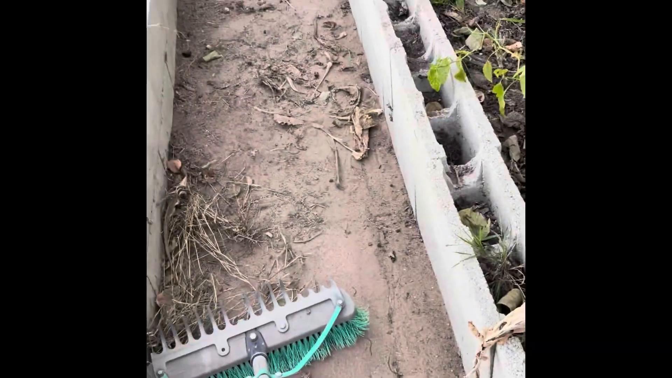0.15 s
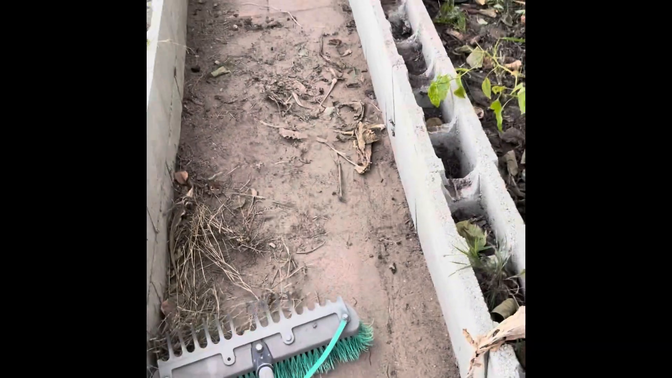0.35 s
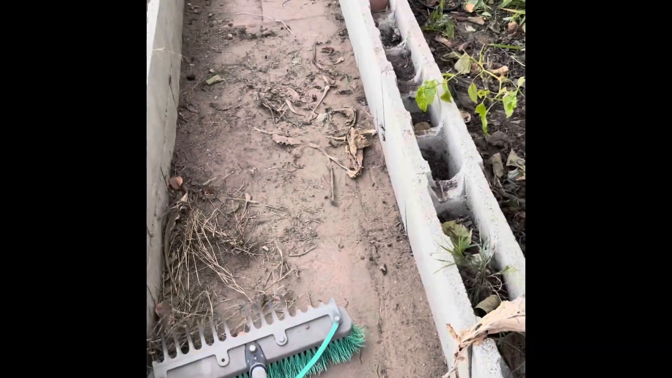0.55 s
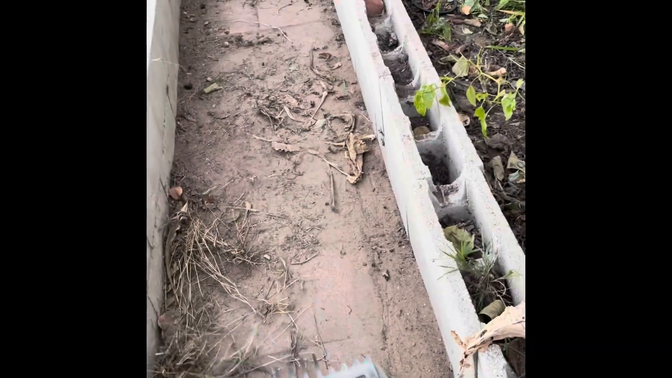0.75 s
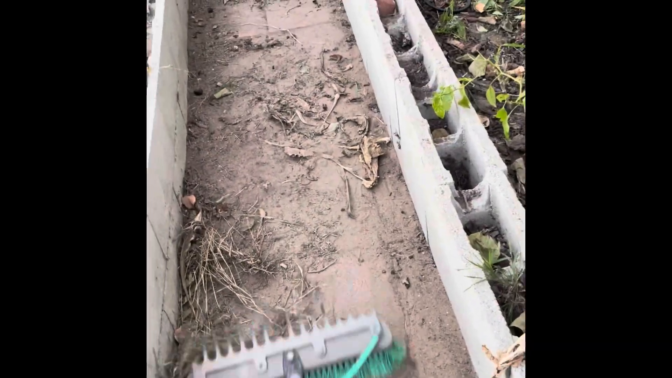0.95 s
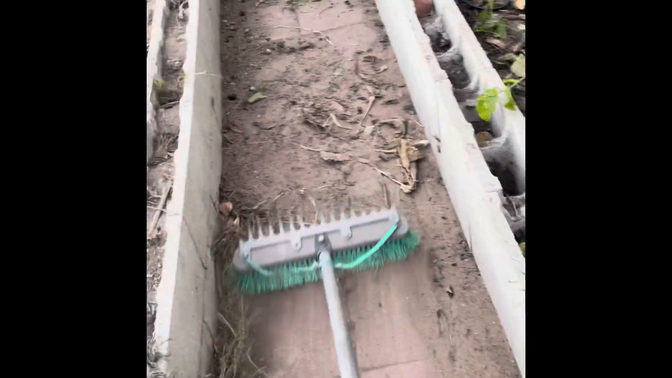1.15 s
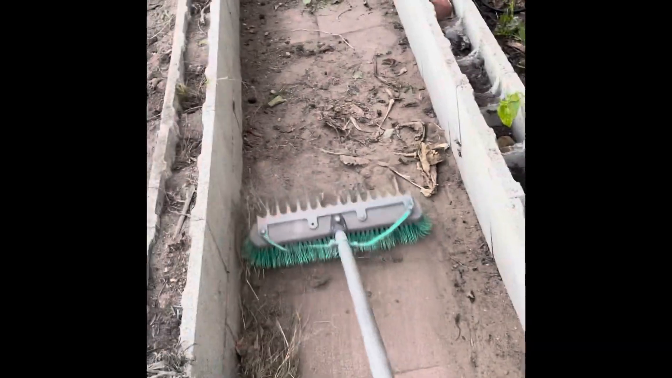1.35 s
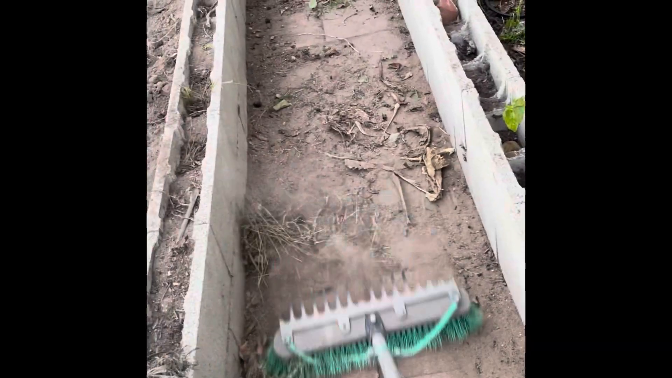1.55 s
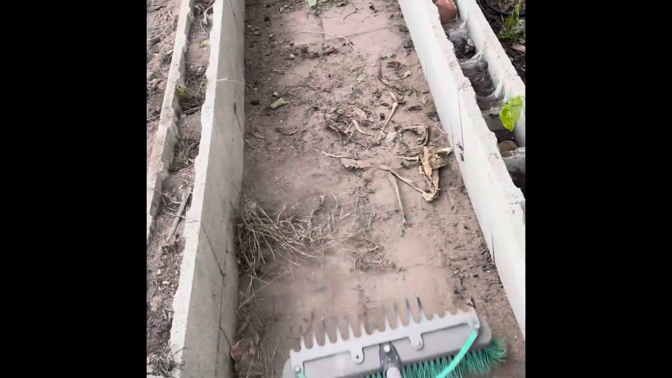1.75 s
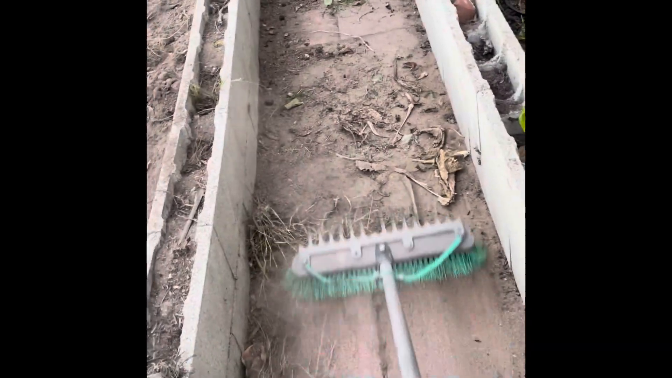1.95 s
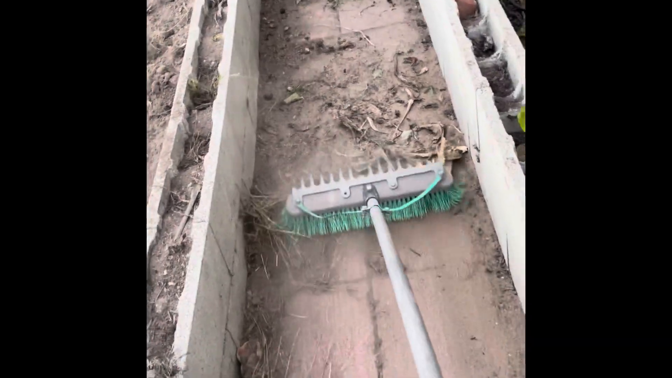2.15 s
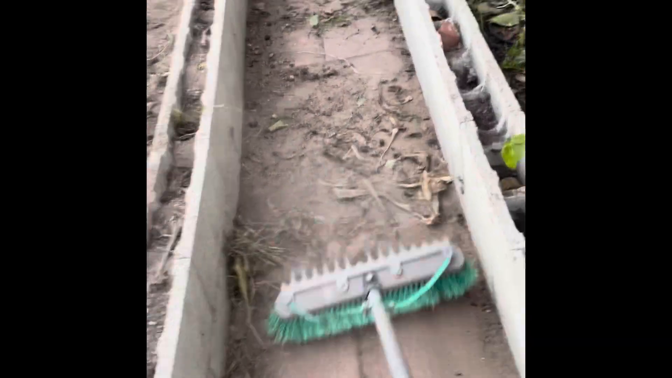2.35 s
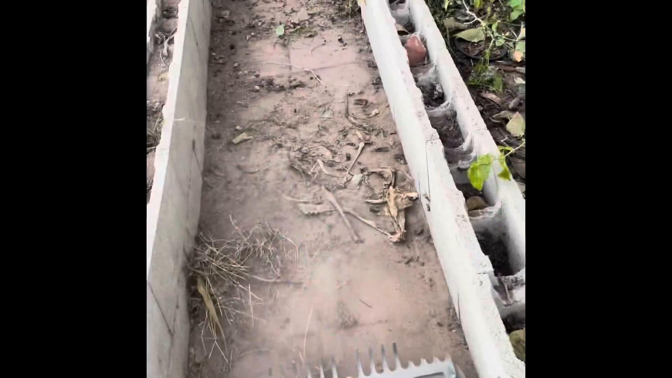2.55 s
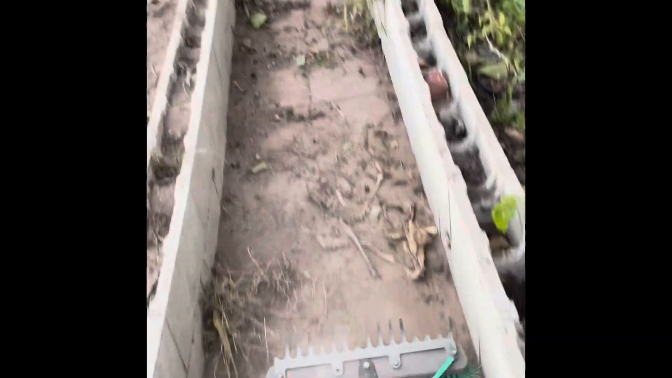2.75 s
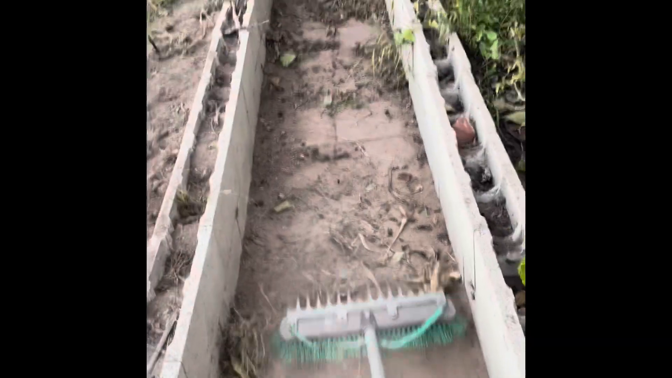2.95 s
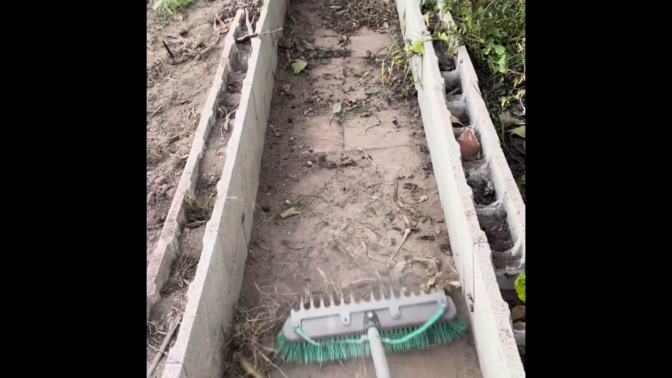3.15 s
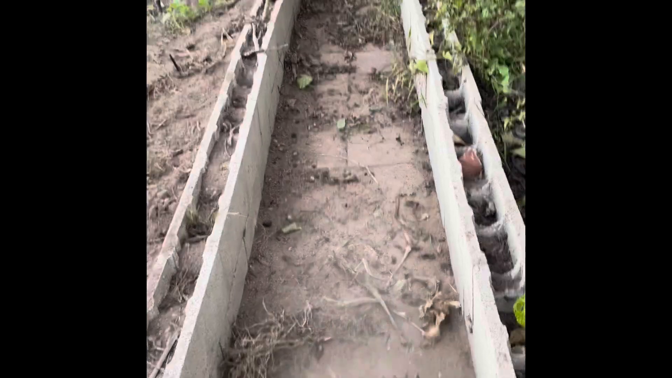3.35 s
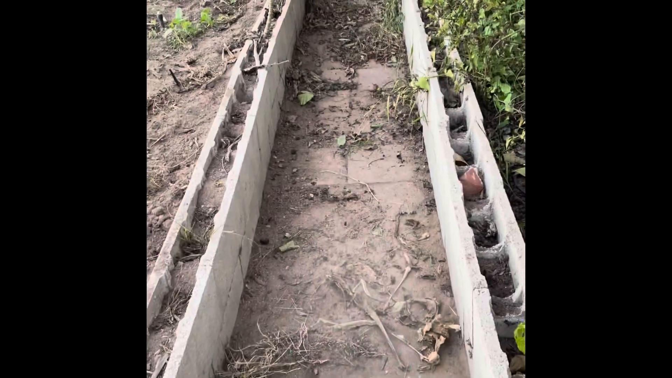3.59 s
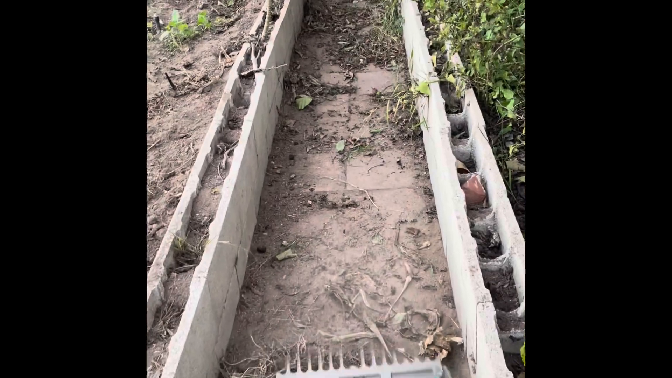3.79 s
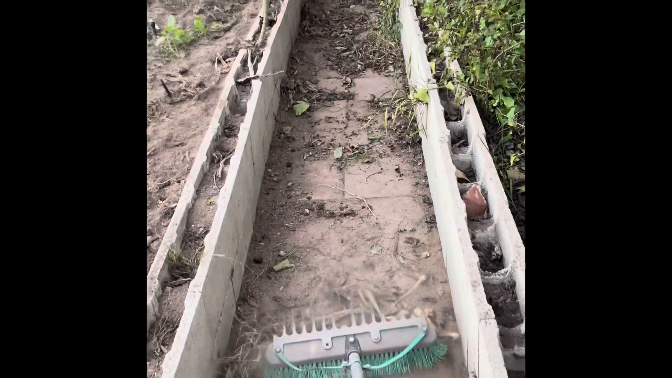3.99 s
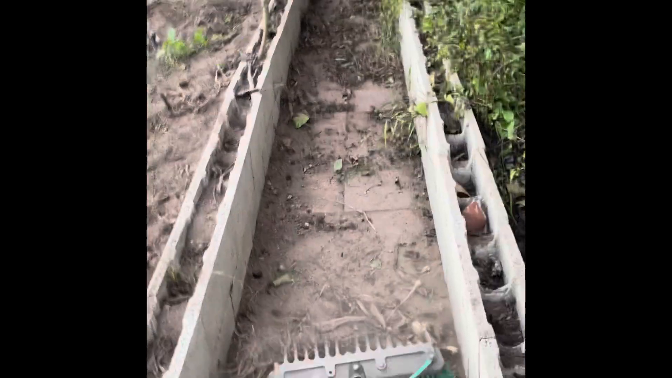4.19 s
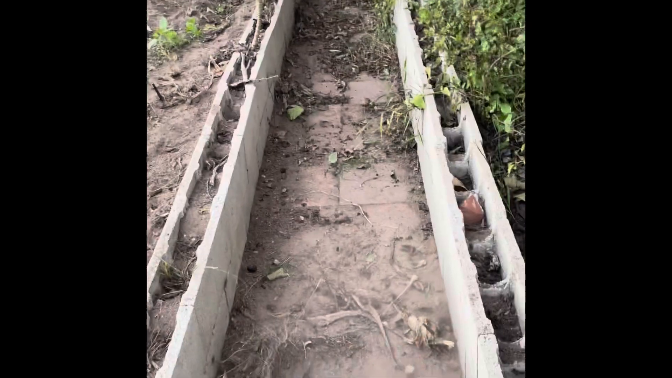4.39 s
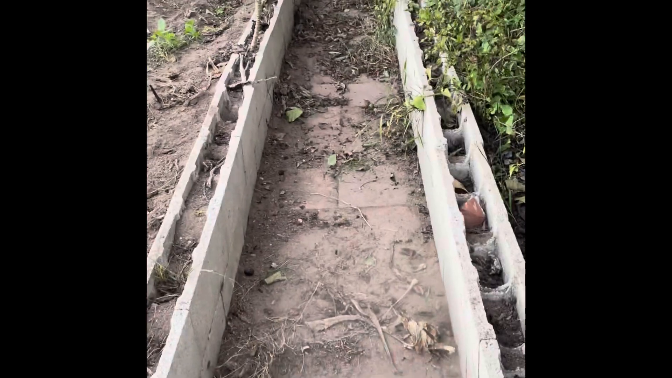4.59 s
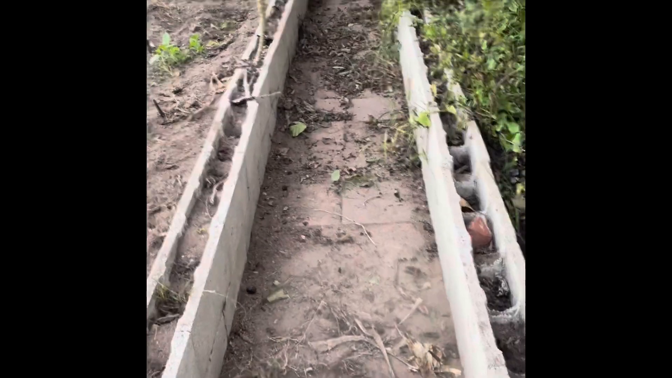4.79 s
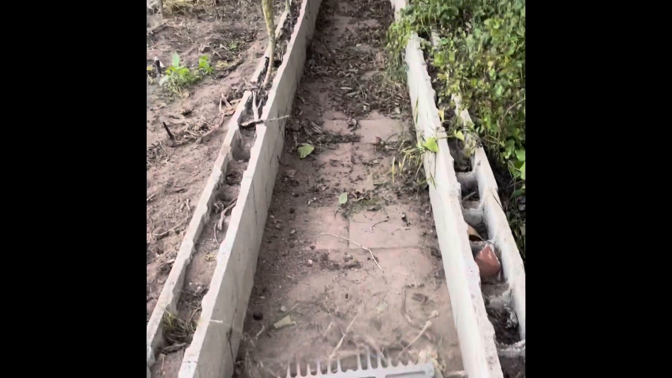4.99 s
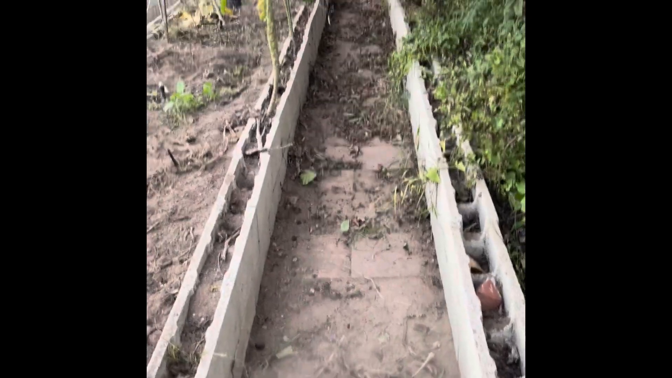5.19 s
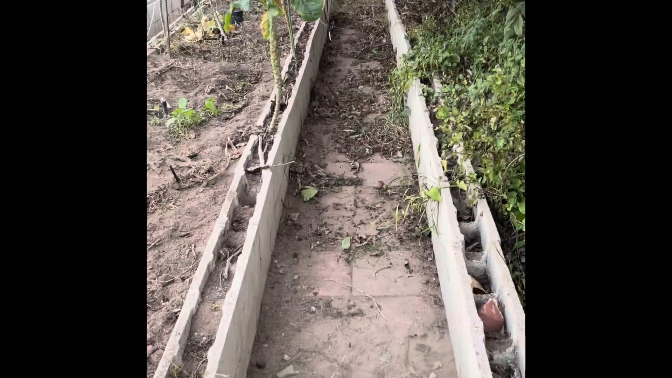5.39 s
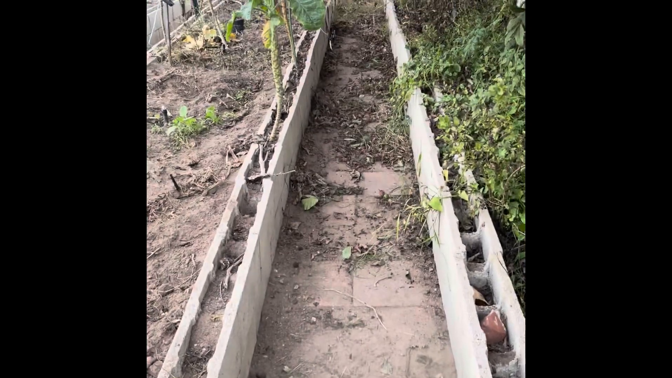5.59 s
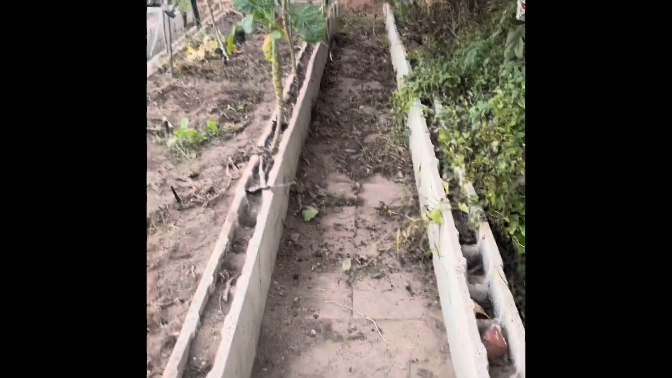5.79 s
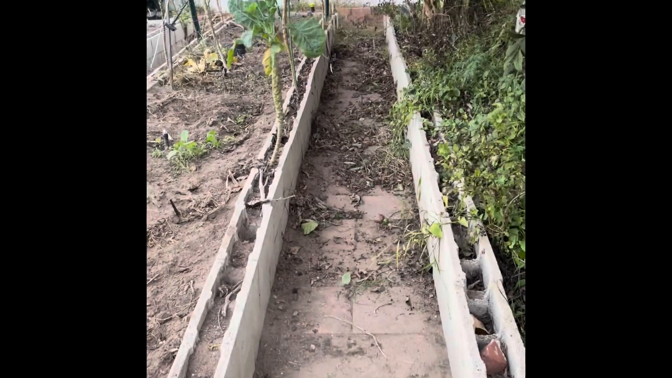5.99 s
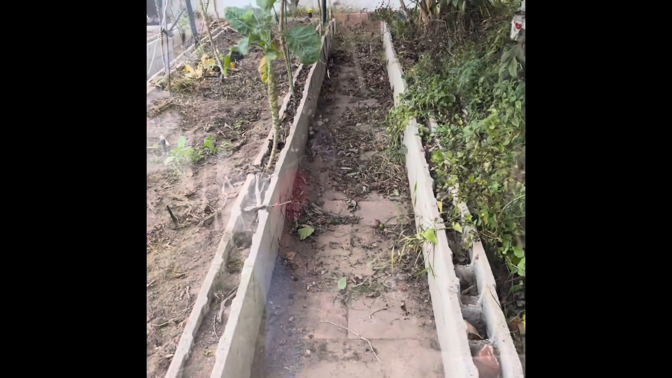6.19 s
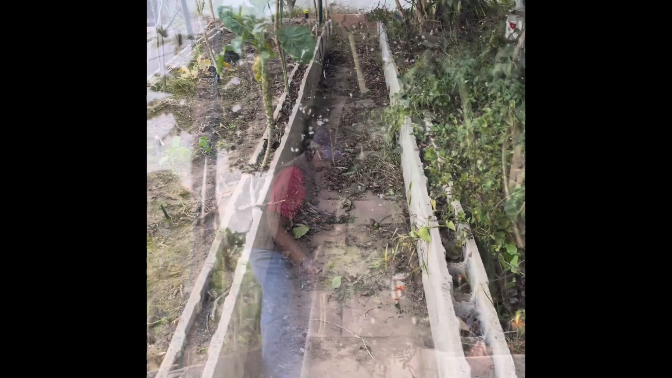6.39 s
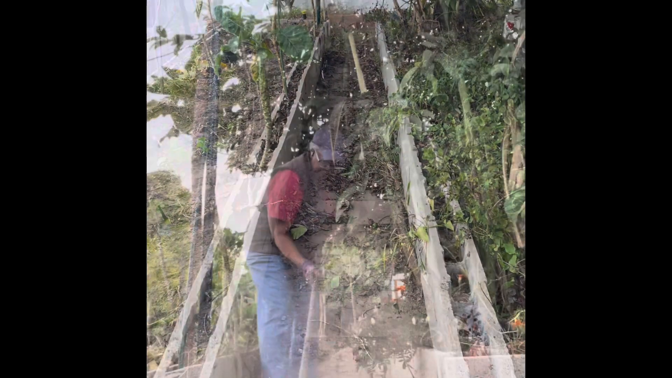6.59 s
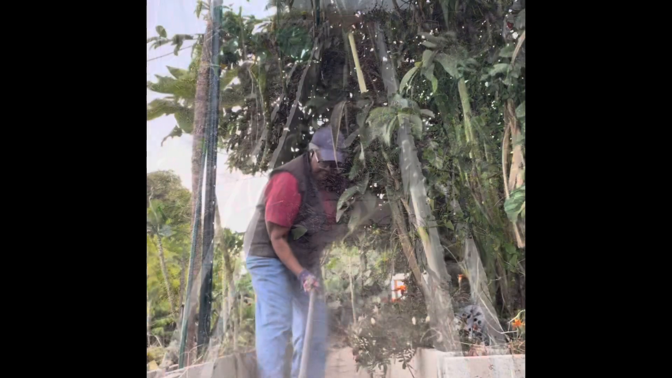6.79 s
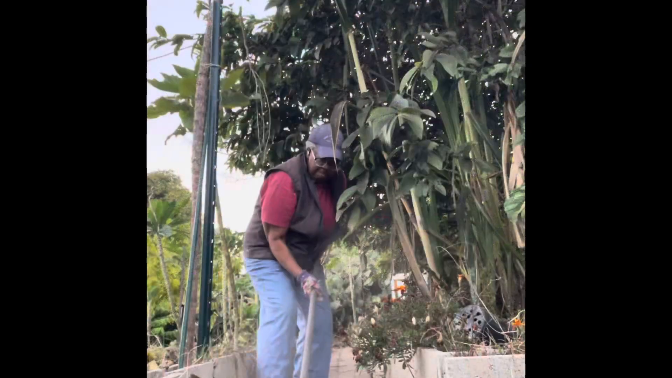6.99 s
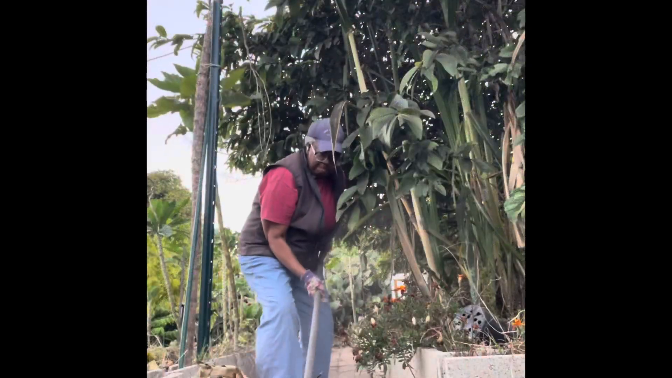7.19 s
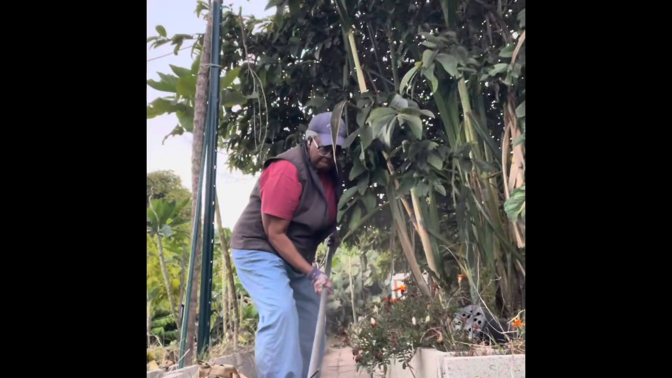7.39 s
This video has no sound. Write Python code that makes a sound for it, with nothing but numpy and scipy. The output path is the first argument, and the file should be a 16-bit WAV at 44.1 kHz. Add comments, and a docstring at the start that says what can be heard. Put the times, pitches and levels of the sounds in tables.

```python
"""A stiff plastic rake-broom is pushed in five strokes over a dusty paved garden path strewn with dry leaves:
its bristles hiss and drag grit, made from filtered random clicks.
Between strokes its head is drawn back, knocks on the slabs and rattles on the metal handle (modes and noise).
Then a broom further off gives a touch and two sweeps, a rustle that swells and dies away.
Distant traffic, made of filtered noise with a wavering hum, rumbles throughout and swells near the end."""
import sys
import numpy as np
from scipy import signal
from scipy.fft import rfft, irfft, next_fast_len
from scipy.io import wavfile
from scipy.ndimage import uniform_filter1d, map_coordinates

SR = 44100
rng = np.random.default_rng(int(sys.argv[2]) if len(sys.argv) > 2 else 0)


def dump(signal):
    """Clip the signal to [-1, 1] and save it as 16-bit WAV at the path in sys.argv[1]."""
    limited = np.clip(np.atleast_2d(signal).T, -1, 1)
    pcm = np.round(limited * 32767).astype(np.int16)
    wavfile.write(sys.argv[1], SR, pcm)


N = 328104
TIME = np.arange(N) / SR  # seconds

# blows of the head: (time [s], plastic knock [dB], handle clink [dB], knock centre [Hz], t60 [s])
# t60 is the time a sound takes to fall by 60 dB
KNOCKS = [ (0.146, -40.5, -38, 2930, 0.062), (0.531, -38.5, -49, 1700, 0.025),
          (0.593, -29.5, -33.5, 1020, 0.066), (0.7314, -19.5, -19.5, 1280, 0.065),
          (0.816, -40, -16, 1910, 0.027), (0.8255, -43, -28, 2190, 0.019), (0.835, -23, -46, 1040, 0.02),
          (0.8501, -20, -4.5, 3010, 0.033), (1.3444, -19.5, -26.5, 1070, 0.063),
          (1.4636, -21.5, -55, 1540, 0.034), (1.579, -22, -32, 2200, 0.048),
          (1.5898, -24.5, -16, 1410, 0.051), (1.602, -27.5, -17, 1500, 0.065),
          (1.615, -26, -21.5, 1300, 0.083), (1.6369, -28.5, -16.5, 2160, 0.13),
          (1.6446, -17.5, -30, 2100, 0.067), (1.6945, -16.5, -14.5, 876, 0.048),
          (1.714, -19.5, -11.5, 2400, 0.045), (1.737, -30, -26.5, 2090, 0.06),
          (2.12, -26, -17.5, 2280, 0.037), (2.152, -28, -20.5, 2050, 0.026),
          (2.1845, -23, -25.5, 1900, 0.07), (2.1946, -19.5, -34, 840, 0.056),
          (2.3004, -31, -42, 1116, 0.036), (2.3435, -36.5, -60, 900, 0.049),
          (2.4657, -14, -8.5, 2540, 0.055), (2.4715, -20, -13.5, 1500, 0.087),
          (2.479, -27, -50, 247, 0.074), (2.503, -22, -20.5, 1760, 0.083),
          (2.5227, -27.5, -31, 1490, 0.088), (2.562, -36.5, -40, 1770, 0.11),
          (2.611, -32, -31.5, 1100, 0.091), (3.0037, -20.5, -9.5, 2680, 0.022),
          (3.1517, -22.5, -13, 1580, 0.053), (3.3057, -28.5, -26, 1230, 0.074),
          (3.326, -32.5, -27, 397, 0.18), (3.339, -34, -17.5, 600, 0.061), (3.4396, -28, -20, 450, 0.042),
          (3.4461, -27, -16.5, 1380, 0.09), (3.4699, -20.5, -18.5, 1390, 0.083),
          (3.491, -22, -40, 1490, 0.038), (3.75, -22, -15, 1990, 0.011), (4.114, -27, -15.5, 1540, 0.019),
          (4.1256, -16.5, -27, 1490, 0.072), (4.157, -16.5, -40, 2160, 0.054),
          (4.2193, -33.5, -30.5, 900, 0.056), (4.314, -50, -22, 3420, 0.043),
          (4.4095, -18, -17.5, 1750, 0.097), (4.413, -26, -49, 240, 0.066),
          (4.4372, -22.5, -13.5, 1980, 0.045), (4.4502, -17.5, -19, 1750, 0.074),
          (4.478, -29, -25, 2000, 0.044), (4.4858, -33, -25.5, 1470, 0.21),
          (4.6113, -27.5, -14.5, 2200, 0.047), (5.056, -27.5, -31, 2500, 0.016),
          (5.0699, -21, -30.5, 1300, 0.093), (5.1837, -30, -48, 1007, 0.033),
          (5.27, -16.5, -26, 1900, 0.064), (5.3838, -16, -27, 2230, 0.05), (5.393, -27.5, -23, 1710, 0.16),
          (5.4407, -31, -14.5, 1820, 0.057), (5.613, -36, -26, 2400, 0.044),
          (5.6199, -34.5, -21.5, 2020, 0.082)]
# head and handle ring on after a bounce: (time [s], level [dB], centre [Hz], t60 [s])
FREE_RINGS = [(1.597, -27.5, 3892, 0.11), (2.195, -32, 865, 0.061), (2.468, -24.5, 2142, 0.15),
              (3.153, -40, 3892, 0.15), (3.324, -41, 3892, .2), (4.4377, -19.5, 7300, 0.087),
              (4.486, -20.5, 7500, 0.15), (4.503, -37.5, 3892, 0.3)]
# strokes of the bristles over the slabs: (time at full pressure [s], length [s], hiss [dB])
STROKES = [(0.918, 0.26, -28), (1.824, 0.12, -28.5), (2.692, 0.18, -29.5), (3.603, 0.33, -32),
           (4.693, 0.2, -30)]
# the head scuffs the ground as it is set down, turned or stopped:
# (time [s], length [s], hiss [dB], grit [dB])
SCUFFS = [(0.56, 0.12, -48, -48.5), (0.76, 0.0076, -34.5, -37), (2.07, 0.12, -38.5, -40),
          (2.958, 0.037, -27, -31), (3.135, 0.026, -40, -40), (3.32, 0.024, -31.5, -35.5),
          (3.41, 0.056, -43, -45.5), (3.83, 0.058, -53, -36), (4.32, 0.032, -36, -57),
          (5.275, 0.024, -30.5, -37.5), (5.405, 0.073, -39.5, -42.5), (5.607, .025, -47, -49.5)]
# the carried rake brushes lightly over the dirt: (time [s], length [s], hiss [dB], grit [dB])
BRUSHINGS = [(0.0, 0.44, -58, -61.5), (0.8, 1.5, -44.5, -54), (2.68, 2.44, -49.5, -55.5),
             (5.63, 0.034, -50, -57)]
# swings of the broom further off, before the garden smears them: (start [s], length [s], peak level [dB])
FAR_STROKES = [(6.222, 0.051, -41), (6.295, 0.37, -47), (6.651, 0.77, -33.5)]
# that broom taps the ground: (time [s], level [dB])
FAR_TICKS = [(6.235, -47.5), (6.582, -45), (6.718, -46)]

# modes (natural pitches) of the handle tube, before each blow varies them: (frequency [Hz], level [dB])
TUBE = [(3100, -12), (3892, -11.5), (4520, -6), (5790, -6.5), (6580, -7), (7343, -3), (7680, -0.5),
        (7924, -15), (8560, -17), (9720, 12), (11000, -12)]
# lingering modes of the head, before each blow varies them: (frequency [Hz], level [dB])
HEAD_RING = [(865, -4.5), (965, -1), (1060, 1.5), (2142, 3.5)]

# colour of the plastic head, before each blow's own centre is favoured: (frequency [Hz], level [dB])
HEAD = [(80, -4.5), (200, -4), (480, -4.5), (960, 5), (1550, -5.5), (2150, 0.5), (2700, -3.5), (3900, -5),
        (7500, 4.5), (14000, -52)]
# colour of the scrape of the socket on the handle: (frequency [Hz], level [dB])
CLINK = [(2500, -17.5), (5000, 4), (7000, -4), (9000, 5.5), (11000, -1), (12300, -10), (14000, -58)]
# colour of the bristle hiss: (frequency [Hz], level [dB])
BRISTLES = [(2500, -19.5), (4200, -3.5), (6500, -5.5), (9300, 0.5), (10700, 3), (12200, -15.5),
            (16000, -35)]
# colour of dragged grit: (frequency [Hz], level [dB])
GRIT = [(150, -14.5), (520, -9.5), (1100, -1), (1700, -2.5), (3800, -4), (6000, -6), (10000, -39)]
# colour of the crackle of dry leaves: (frequency [Hz], level [dB])
LEAVES = [(500, -10), (1500, 0), (7000, 2), (13000, -33)]
# colour of the rustle of the broom further off: (frequency [Hz], level [dB])
FAR_BROOM = [(300, -3), (1300, -5), (2150, 1.5), (2500, -6), (3400, -1), (4300, -7), (5200, 0), (16000, -5)]
# colour of the traffic rumble: (frequency [Hz], level [dB])
TRAFFIC = [(22, -45), (42, 3), (65, 2), (105, -3), (160, -15.5), (700, -32), (2000, -43.5), (14000, -61.5)]

# phase that turns left and right apart, for near sounds: (frequency [Hz], lead of the left [radians])
NEAR_PHASE = [(3800, 0), (4800, 3.1), (5700, 6.1), (6300, 6.4), (8700, 9.25), (9500, 9.55), (12100, 12.57)]
# the same for far sounds: (frequency [Hz], lead of the left [radians])
FAR_PHASE = [(4000, 0), (4850, -3), (5600, -2), (8000, -2), (11200, 0)]
# near sound that differs left and right: (frequency [Hz], level relative to the shared sound [dB])
NEAR_WIDTH = [(400, -13.5), (1500, -19.5), (2400, -9.5), (4300, -7.5), (11000, -11)]
# the same for far sounds: (frequency [Hz], level relative to the shared sound [dB])
FAR_WIDTH = [(500, -24), (2100, -7), (12000, -21)]

STROKE_RISE_DB_S, STROKE_SAG_DB_S, STROKE_FALL_DB_S = 186, 3.5, 85  # the bristles bite, slow down and lift
STROKE_GRIT_DB, PILE_DB_S = -11, 6  # grit relative to the hiss; it grows as dirt piles up ahead
SCUFF_RISE_DB_S, SCUFF_FALL_DB_S = 592, 225
BRUSH_RISE_DB_S, BRUSH_FALL_DB_S = 106, 57
LEAF_DB = -8  # relative to the grit
FAR_ARCH = 1.42  # how strongly the loudness follows the speed of the swing
FAR_TAP_HZ, FAR_TAP_T60_S, GARDEN_T60_S = 1978, 0.09, 0.2
TOP_HZ = 15900  # treble limit of the recorder


def undb(db):
    """Turn decibels into gain."""
    return 10 ** (np.asarray(db) / 20)


def unit(x):
    """Scale to an rms (average strength) of 1."""
    return x / np.sqrt(np.mean(x ** 2))


def curve(rows):
    """Join (time [s], value) points by straight lines."""
    times, values = np.transpose(rows)
    return np.interp(TIME, times, values)


def shape(x, points):
    """Filter through a gain curve of (frequency [Hz], gain [dB]) points."""
    hz, db = np.transpose(points)
    size = next_fast_len(len(x))
    f = np.fft.rfftfreq(size, 1 / SR) + 1  # the 1 avoids log(0)
    gain = undb(np.interp(np.log(f), np.log(hz), db))
    return irfft(rfft(x, size) * gain, size)[:len(x)]


def colour(x, points):
    """Filter a sound through (frequency [Hz], level [dB]) points and scale it to rms 1."""
    return unit(shape(x, points))


def walk(rate):
    """Smooth random wandering at about rate new values a second, rms 1."""
    size = int(SR / rate)
    steps = np.repeat(rng.standard_normal(N // size + 1), size)
    return unit(uniform_filter1d(steps, size)[:N])


def grains(rate, spread_db):
    """Tiny clicks of random strength at random moments, about rate of them a second."""
    clicks = (rng.random(N) < rate / SR) * rng.standard_normal(N)
    return clicks * undb(spread_db * np.minimum(rng.exponential(size=N), 6))


def fade(t, t60):
    """Exponential decay that falls by 60 dB in t60 seconds."""
    return np.exp(-np.log(1000) * t / t60)


def ring(t, modes, spread_db, detune=0.0031):
    """Undamped modes at rms 1; each point of contact favours different ones and pulls them off pitch."""
    hz, db = np.transpose(modes)
    strength, pull, start = rng.standard_normal((3, len(hz)))
    pulled_hz = hz * (1 + detune * pull)
    waves = np.sin(2 * np.pi * (np.outer(pulled_hz, t) + start[:, None]))
    return unit(undb(db + spread_db * strength) @ waves)


def traffic():
    """Low rumble, nearly the same on both sides; near the end it swells, with the hum of a distant engine."""
    rumble = colour(rng.standard_normal(N), TRAFFIC) * undb(-41.0 + 1.04 * walk(3.27))
    diffuse_points = [(45, 0), (120, -9), (250, -1.0), (800, 4.0), (2000, -21.0)]
    diffuse = undb(-63.5) * colour(rng.standard_normal(N), diffuse_points)
    hum_hz = 112 + 2.8 * walk(13)
    hum = np.sin(2 * np.pi * np.cumsum(hum_hz) / SR)
    roar = colour(rng.standard_normal(N), [(40, -24.0), (85, 10.5), (200, -3.5), (2000, -36.5)])
    swell = undb(curve([(6.2, -32), (6.6, -8), (7.1, 0)]))
    opposite_sides = np.array([[1], [-1]])
    return rumble + diffuse * opposite_sides + swell * undb(-41.0) * (hum + roar)


def press(start, length, rise_db_s, fall_db_s):
    """Gain of a contact with the ground: it builds up, holds and dies away."""
    before = np.maximum(start - TIME, 0)
    after = np.maximum(TIME - start - length, 0)
    return undb(-rise_db_s * before - fall_db_s * after)


def flicker(x, depth_db, width_hz, hold_s, drift=0.016, size=512):
    """Uneven rustle: random narrow bands swell, sink and slide on their own."""
    hz, s, bands = signal.stft(x, SR, nperseg=size)
    bend = 1 + drift * np.interp(s, TIME, walk(6))
    # read a random map of levels at each pitch and moment
    place = np.broadcast_arrays(np.outer(hz, bend) / width_hz, s / hold_s)
    swell = map_coordinates(rng.standard_normal((size, size)), place, order=1, mode="mirror")
    return unit(signal.istft(bands * undb(depth_db * unit(swell)), SR)[1][:N])


def bristles():
    """Thousands of bristle tips flick over the slabs and drag grit and dry leaves in uneven catches."""
    power = np.zeros((2, N))  # hiss, grit
    for s, length, db in STROKES:
        pushed = np.clip(TIME - s, 0, length)  # seconds into the stroke
        pressure = press(s, length, STROKE_RISE_DB_S, STROKE_FALL_DB_S)
        hiss_gain = pressure * undb(db - STROKE_SAG_DB_S * pushed)
        grit_gain = hiss_gain * undb(STROKE_GRIT_DB + PILE_DB_S * pushed)
        power += np.array([hiss_gain, grit_gain]) ** 2
    light_contacts = [(SCUFFS, SCUFF_RISE_DB_S, SCUFF_FALL_DB_S),
                      (BRUSHINGS, BRUSH_RISE_DB_S, BRUSH_FALL_DB_S)]
    for rows, rise, fall in light_contacts:
        for s, length, hiss_db, grit_db in rows:
            power += np.outer(undb([hiss_db, grit_db]), press(s, length, rise, fall)) ** 2
    hiss = colour(grains(rate=20000, spread_db=0.5), BRISTLES)
    hiss = flicker(hiss, depth_db=3.0, width_hz=417, hold_s=0.035)
    grit = colour(grains(rate=4500, spread_db=1.0), GRIT)
    grit = flicker(grit, depth_db=3.0, width_hz=218.6, hold_s=0.04)
    leaves = undb(LEAF_DB) * colour(grains(rate=260, spread_db=2.5), LEAVES)
    return hiss * np.sqrt(power[0]) + (grit + leaves) * np.sqrt(power[1])


def contact(t, t60, chatter_db=4.0, chatter_s=0.00558):
    """A decay made ragged by tiny bounces; the longer the contact drags on, the more gently it starts."""
    bounces = np.interp(t / chatter_s, np.arange(len(t)), rng.standard_normal(len(t)))
    settled = np.minimum(t / chatter_s / 2, 1)  # the first impact is clean, the chatter follows it
    soft_start = np.minimum(t / (0.016 * t60), 1)
    return fade(t, t60) * undb(chatter_db * settled * bounces) * soft_start


def knock(t, centre_hz, t60, focus_db=8.0, crunch_db=-9, crack_db=-3, crack_t60=0.011,
          modes_db=-2, ring_db=-24, ring_t60=0.29, count=26):
    """The ribbed head: crowded, damped modes round a centre set by the contact; grit cracks and crunches."""
    weighted = []
    for hz, db in HEAD:
        octaves_off = abs(max(np.log2(hz / centre_hz), -1))  # low pitches lose one octave's worth at most
        weighted.append((hz, db - focus_db * octaves_off))
    mode_hz = 130 + 175 * (np.arange(count) + rng.random(count))
    mode_db = np.interp(mode_hz, *np.transpose(weighted))
    modes = ring(t, np.c_[mode_hz, mode_db], spread_db=5.5)
    crunch = colour(rng.standard_normal(len(t)), weighted)
    lingering = undb(ring_db) * ring(t, HEAD_RING, spread_db=-0.5) * fade(t, ring_t60)
    crack = undb(crack_db) * crunch * fade(t, crack_t60)
    body = undb(modes_db) * modes + undb(crunch_db) * crunch
    return contact(t, t60) * body + crack + lingering


def clink(t, t60, scrape_db=-2.0, tube_db=0, ring_db=-18, ring_t60=0.14):
    """The loose socket strikes the handle: a short blow mostly scrapes, a freer one lets the tube ring."""
    freedom = np.clip(t60 / ring_t60, 0, 1)
    # the tube's pitches shift with the grip
    tube = ring(t, TUBE, spread_db=7, detune=0.019) * np.sqrt(freedom)
    scrape = colour(rng.standard_normal(len(t)), CLINK) * np.sqrt(1 - freedom / 2)
    lingering = undb(ring_db) * tube * fade(t, ring_t60)
    return contact(t, t60) * (undb(scrape_db) * scrape + undb(tube_db) * tube) + lingering


def rattle(attack_s=0.00093, touch_s=0.0051, touch_db=-13):
    """Each blow sounds head and handle together; the teeth scuff just before, louder for a harder knock."""
    out, touch = np.zeros(N), np.zeros(N)
    t = TIME[:SR // 6]
    lead = t[:SR // 20]
    for s, knock_db, clink_db, centre_hz, t60 in KNOCKS:
        blow = undb(knock_db) * knock(t, centre_hz, t60) + undb(clink_db) * clink(t, t60)
        start = int(s * SR)
        out[start:start + len(t)] += blow * np.minimum(t / attack_s, 1)
        touch[start - len(lead):start] += undb(knock_db) * np.exp(-lead[::-1] / touch_s)
    clicks = grains(rate=7000, spread_db=0.0)
    scuff = (colour(clicks, GRIT) + colour(clicks, BRISTLES)) / 2
    return out + undb(touch_db) * touch * scuff


def free_rings(boost_db=30, octaves=0.13):
    """When the head bounces clear of the ground, the modes near one frequency sing on."""
    out, t = np.zeros(N), TIME[:SR // 2]
    hz, db = np.transpose(HEAD_RING + TUBE)
    for s, level_db, centre_hz, t60 in FREE_RINGS:
        nearness = np.exp(-(np.log2(hz / centre_hz) / octaves) ** 2)
        favoured = np.c_[hz, db + boost_db * nearness]
        start = int(s * SR)
        out[start:start + len(t)] += undb(level_db) * ring(t, favoured, spread_db=2.5) * fade(t, t60)
    return out


def rake():
    """Bristle strokes and the rattle and ringing between them."""
    return bristles() + rattle() + free_rings()


def far_broom():
    """A touch, a short stroke and a long one: a rustle swells with each and dies away, with a few taps."""
    swings = np.zeros(N)
    for s, length, db in FAR_STROKES:
        speed = np.sin(np.pi * np.clip((TIME - s) / length, 0, 1)).clip(0)
        swings += undb(db) * speed ** FAR_ARCH
    t = TIME[:SR // 6]
    # the garden spreads the power of each swing over a decaying tail
    tail = fade(t, GARDEN_T60_S) ** 2
    gain = np.sqrt(abs(signal.fftconvolve(swings ** 2, tail / tail.sum())[:N]))
    rustle = colour(grains(rate=9000, spread_db=-2.0), FAR_BROOM)
    out = rustle * gain * undb(1.0 * walk(60))
    for s, db in FAR_TICKS:
        start = int(s * SR)
        out[start:start + len(t)] += undb(db) * knock(t, FAR_TAP_HZ, FAR_TAP_T60_S)
    return out


def stereo(source, phase, width):
    """Turn left and right apart by a phase that varies with frequency; add sound opposite on each side."""
    turn = np.exp(0.5j * np.interp(np.fft.rfftfreq(N, 1 / SR), *np.transpose(phase)))
    shared = irfft(rfft(source()) * np.array([turn, 1 / turn]), N)
    # a second run of the source draws fresh random detail
    differing = shape(source(), width) * np.array([[1], [-1]])
    return shared + differing


def scene():
    """The rake close by, then the broom further up the garden, over the traffic."""
    near = stereo(rake, NEAR_PHASE, NEAR_WIDTH)
    far = stereo(far_broom, FAR_PHASE, FAR_WIDTH)
    return near + far + traffic()


def record(dry):
    """The recorder rounds the loudest peaks and cuts the top."""
    rounded = np.tanh(dry)
    low_pass = signal.ellip(10, 0.2, 70, TOP_HZ, fs=SR, output="sos")
    return signal.sosfilt(low_pass, rounded)


dry = scene()
out = record(dry)
dump(out)
```